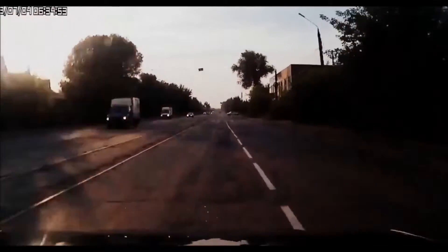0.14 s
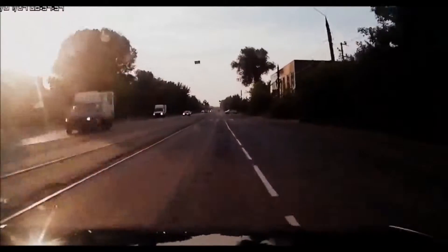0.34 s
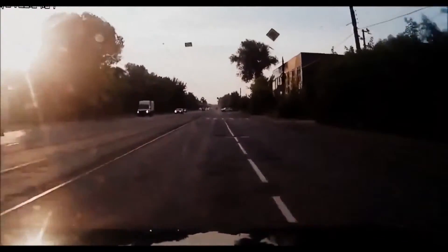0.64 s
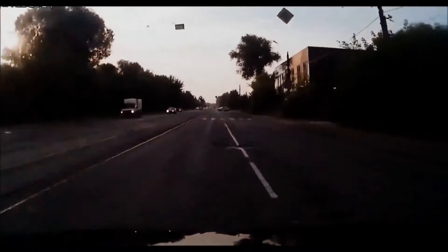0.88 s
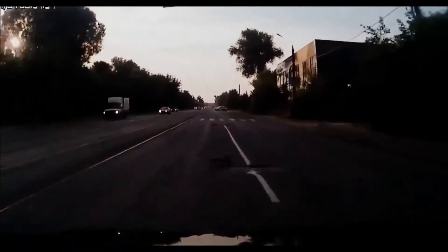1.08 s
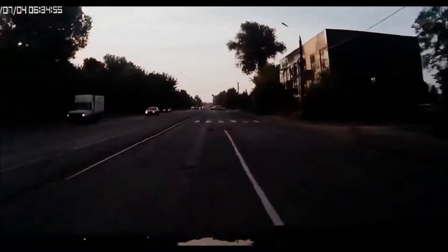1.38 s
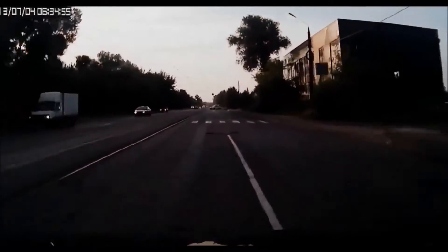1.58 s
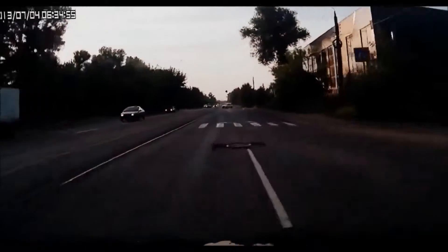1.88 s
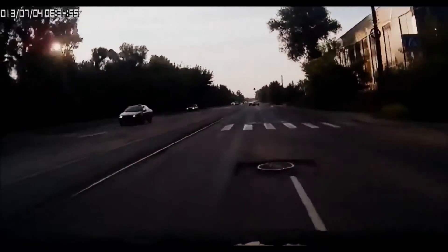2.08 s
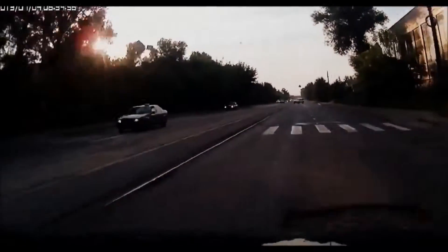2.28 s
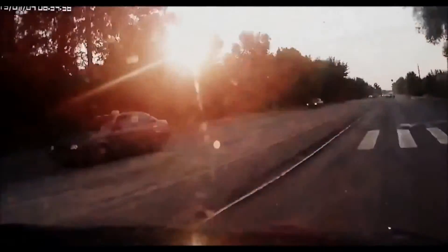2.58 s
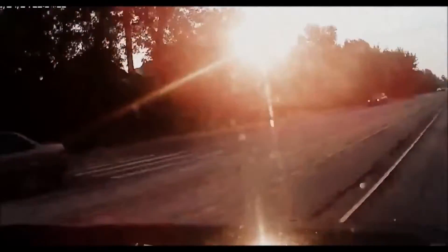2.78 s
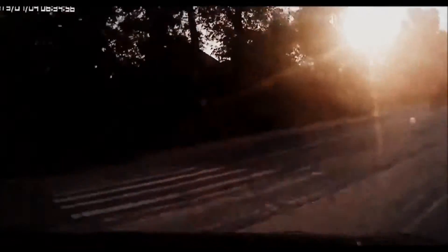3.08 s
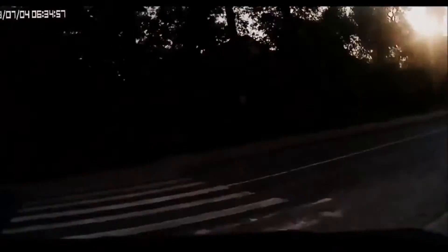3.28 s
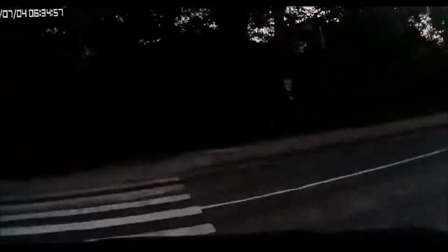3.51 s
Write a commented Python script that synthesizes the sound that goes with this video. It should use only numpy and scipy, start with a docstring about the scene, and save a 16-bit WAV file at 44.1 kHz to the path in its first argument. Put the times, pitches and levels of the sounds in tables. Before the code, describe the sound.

A car crash from the cabin, road noise with plastic ticks giving way to violent knocks and crunches.

```python
"""A steady road roar over a wavering engine hum, while a plastic windscreen mount ticks beside the microphone.
The car strikes a hole, slews and is hit again: crunching, low shudder, hard knocks and broken tyre chirps.
Roar and shudder are filtered noise, crunching is dense random impulses, ticks and knocks are enveloped or
decaying partials with noise, chirps are gliding tones and a faint whine is steady sines.
The sound cuts out to a thin hiss in short listed gaps; its peaks are clipped hard, almost flat, at the ceiling."""
import sys
import numpy as np
from scipy import signal
from scipy.fft import rfft, irfft, next_fast_len
from scipy.io import wavfile
from scipy.ndimage import map_coordinates

SR = 44100
rng = np.random.default_rng(int(sys.argv[2]) if len(sys.argv) > 2 else 0)


def voltage_ratio(decibels):
    """Convert decibels (scalar or array-like) to amplitude ratios, 20 dB per decade."""
    exponent = np.asarray(decibels, float) / 20
    return 10 ** exponent


def wav_out(sig):
    """Save sig, one row per channel (or a flat mono array), as 16-bit PCM at SR to the path in sys.argv[1]."""
    wavfile.write(sys.argv[1], SR, np.round(np.clip(np.atleast_2d(sig).T, -1, 1) * 32767).astype(np.int16))


N = 160965


def unit(x):
    """Normalisation: scales a signal to an rms of 1."""
    return x / np.sqrt(np.mean(x ** 2) + 1e-20)


def curves(rows):
    """Linear interpolation: one value per sample for each column after the time."""
    s, *cols = np.transpose(rows)
    return [np.interp(np.arange(N) / SR, s, c) for c in cols]


def wobble(rate):
    """Band-limited fluctuation: a spline through random knots, rate of them a second."""
    knots = rng.standard_normal(int(N * rate / SR) + 4)
    return map_coordinates(knots, [np.arange(N) * rate / SR])


def coloured(x, points):
    """Linear filtering: shapes the spectrum by (Hz, dB) points on a log-frequency axis, to rms 1."""
    m = next_fast_len(N + 8192)
    f, db = np.transpose(points)
    log_hz = np.log(np.fft.rfftfreq(m, 1 / SR) + 1)
    gain = voltage_ratio(np.interp(log_hz, np.log(f + 1), db))
    return unit(irfft(rfft(x, m) * gain, m)[:N])


def add(out, s, sound):
    """Superposition: mixes a sound in from time s, in seconds."""
    part = out[round(s * SR):][:len(sound)]
    part += sound[:len(part)]


def whine():
    """Steady pure tones from electronics, slightly modulated in amplitude."""
    # tones: f/Hz, relative level/dB (raised by 5 dB below)
    tones = [(7881, -69), (11989, -69)]
    t = np.arange(N) / SR
    return sum(voltage_ratio(db + 5 + 1.5 * wobble(25)) * np.sin(2 * np.pi * hz * t) for hz, db in tones)


def engine():
    """Phase modulation of a low sine by a slow random curve gives a wavering hum."""
    hum_hz, hum_db, stop_s, fade_s = 90.3, -36.5, 1.9, 0.085
    t = np.arange(N) / SR
    level = voltage_ratio(hum_db + wobble(6.9))
    tone = np.sin(2 * np.pi * hum_hz * t + 1.9 * wobble(9.5))
    return level * tone * np.clip((stop_s - t) / fade_s, 0, 1)


def road():
    """Broadband tyre and air turbulence: filtered noise whose level fluctuates gently."""
    # course of the roar: t/s, level/dB
    roar_course = [(0.0, -19), (0.31, -16.5), (0.86, -19), (1.27, -17), (1.74, -22), (2.26, -18.5),
                   (2.74, -28), (3.24, -20), (3.54, -20), (3.65, -29.5)]
    # spectrum of the roar: f/Hz, relative density/dB
    roar_colour = [(15, -51), (25, -19), (76, -6.5), (180, -9), (321, -1.5), (477, -1.5), (604, -1),
                   (689, -7.5), (807, -1.5), (1080, -5), (1400, -15.5), (2030, -12.5), (2570, -29.5),
                   (3260, -29.5), (4470, -48), (7370, -53), (8190, -58), (8860, -78), (11800, -51.5),
                   (13500, -41.5)]
    level_db, = curves(roar_course)
    unsteady_db = 0.63 * wobble(12) + 0.29 * wobble(45.2)
    return voltage_ratio(level_db + unsteady_db) * coloured(rng.standard_normal(N), roar_colour)


def mount():
    """Modal excitation: each tick briefly drives scattered plastic modes with a broadband snap."""
    # ticks: t/s, peak level/dB, level of snap over ring/dB
    tick_events = [(0.2666, -13, -10), (0.2926, -28, -9), (0.4038, -16.5, -24), (0.429, -23, -9),
                   (0.449, -21.5, -3), (0.5003, -14, -10), (0.5265, -14.5, -7), (0.618, -2.5, -8),
                   (0.7006, -16.5, -22), (0.8291, -11, -16), (1.2503, -14, -16), (1.303, -15, -20),
                   (1.3818, -9, -7), (1.5038, -15.5, -19), (1.6445, -18, -20), (1.8157, 1, -9.5),
                   (1.8826, -13, -7), (1.9219, 3.5, -5), (2.0873, -7, 11), (2.1096, -14, -10),
                   (2.1607, 3.5, 0), (2.2782, -5, 1), (2.3217, -23, 5), (2.386, 4.5, -1), (2.4026, -15, 2),
                   (2.437, -8.5, -14), (2.4888, -0.5, -5.5), (2.507, -17, -4), (2.551, -16.5, -4),
                   (2.582, -13.5, -10), (2.6697, -22, -6), (2.7697, -5, 2), (2.7971, 0, 15),
                   (3.0443, -10, -17), (3.235, -13, -10), (3.6085, -10.5, -9), (3.6195, -9.5, 3)]
    # modes of the plastic: f/Hz, relative level/dB
    plastic_modes = [(2200, 15.5), (2600, 4.5), (3700, -12), (4250, -1.5), (5300, -16), (5900, -9.5),
                     (7100, -18), (10200, -21), (12400, -11.5)]
    # spectrum of the snap: f/Hz, relative density/dB
    snap_colour = [(710, -40), (1200, 4), (2230, -6), (3440, -10), (5880, -6.5), (7210, -22), (9000, -35.5),
                   (12200, -22), (13500, -36)]
    tick_s, pitch_scatter, mode_scatter_db = 0.0028, 0.03, 2  # pitch scatter as a fraction
    out, t = np.zeros(N), np.arange(round(tick_s * SR)) / SR
    noise = coloured(rng.standard_normal(N), snap_colour)
    swell = (t / tick_s) ** 1.08 * (1 - t / tick_s) ** 1.43
    for s, db, snap_db in tick_events:
        ring = np.zeros(len(t))
        for hz, mode_db in plastic_modes:
            strength = voltage_ratio(mode_db + rng.normal(0, mode_scatter_db))
            ring += strength * np.sin(2 * np.pi * hz * rng.normal(1, pitch_scatter) * t)
        snap = voltage_ratio(snap_db) * noise[round(s * SR):][:len(t)]
        tick = (unit(ring) + snap) * swell
        add(out, s, voltage_ratio(db) * tick / np.abs(tick).max())
    return out


def chirps():
    """Broken squeal of sliding tyres: gliding tones, part pure and part narrow-band noise, swell and fade."""
    # chirps: centre t/s, length between 1/e points/s, f/Hz at the centre, glide/(Hz/s),
    # relative level/dB (raised by 3.5 dB below)
    squeals = [(2.334, 0.02, 1150, 0, -20), (2.431, 0.036, 1095, 999.5, -14.5), (2.53, 0.011, 3120, 0, -32),
               (2.538, 0.024, 1067, 2000.5, -24), (2.58, 0.022, 1135, 3000, -12.5),
               (2.579, 0.028, 1356, -3000, -14), (2.595, .032, 1500, -5000, -15),
               (2.591, 0.038, 2930, 4000, -28), (2.632, 0.03, 871, 1000.5, -16),
               (2.641, .012, 2010, -6000, -17), (2.649, 0.018, 1690, 4000.5, -17),
               (2.648, .016, 3130, -6000, -34), (2.666, 0.014, 1965, 1500.5, -14),
               (2.686, 0.019, 2010, 0.5, -24), (2.728, 0.018, 1980, 0.5, -20)]
    pure, noise_rate, wander = 0.58, 320, 0.015  # share of pure tone, knots a second, fraction of pitch
    out, t = np.zeros(N), np.arange(N) / SR
    for s, length, hz, glide, db in squeals:
        narrow_noise = wobble(noise_rate) + 1j * wobble(noise_rate)
        shake = pure + (1 - pure) * narrow_noise
        pitch = (hz + glide * (t - s)) * (1 + wander * wobble(60))
        tone = np.real(shake * np.exp(2j * np.pi * np.cumsum(pitch) / SR))
        out += voltage_ratio(db + 3.5) * np.exp(-(2 * (t - s) / length) ** 2) * tone
    return out


def grains():
    """Shot noise: dense random impulses of uneven size and either sign."""
    grains_per_s, spread_db = 9000, 2
    chance, size, sign = rng.random(N), rng.exponential(size=N), rng.standard_normal(N)
    return (chance < grains_per_s / SR) * voltage_ratio(spread_db * size) * sign


def wreck():
    """Crushing and scraping as clumped, filtered shot noise over a low noise shudder of the body."""
    # course of the wreck: t/s, crunch level/dB, bass level/dB, treble level/dB
    wreck_course = [(0, -60, -51, -55.5), (1.66, -31, -44.5, -51), (1.75, -19, -20, -38),
                    (1.8, -14.5, -29, -31), (1.83, -20, -31, -37), (1.9, -12.5, -24, -28.5),
                    (1.93, -32, -32, -40.5), (2.0, -22.5, -27, -44.5), (2.08, -13.5, -21, -28.5),
                    (2.15, -18, -34, -33), (2.2, -21, -39, -32.5), (2.28, -17.5, -35, -35.5),
                    (2.4, -19.5, -25, -37.5), (2.52, -19.5, -38, -38.5), (2.6, -23, -60, -45.5),
                    (2.7, -22, -40, -54), (2.76, -15, -16.5, -31.5), (2.86, -18, -25, -36.5),
                    (2.97, -14, -37, -33), (3.05, -15.5, -40, -32), (3.1, -27.5, -24, -41.5),
                    (3.28, -31.5, -29, -42), (3.36, -18, -53, -35), (3.43, -9.5, -24, -32.5),
                    (3.5, -17, -40, -30.5), (3.55, -24, -26, -37.5), (3.61, -16.5, -26.5, -32),
                    (3.65, -19, -24, -38)]
    # spectra of crunch, its treble and the bass shudder: f/Hz, relative density/dB
    crunch_colour = [(71, -35), (120, -5), (298, -2), (442, 0), (702, -3), (822, -0.5), (1450, -7.5),
                     (2070, -8), (2420, -16), (2800, -22), (3640, -28.5), (6160, -120)]
    treble_colour = [(1650, -44), (2800, -2), (5100, -10), (6170, -10), (7320, -22), (9040, -43),
                     (10700, -19), (12600, -18), (13500, -17)]
    bass_colour = [(15, -33), (25, -14), (91, 2), (172, -3.5), (220, 2.5), (290, -32.5), (480, -120)]
    crunch_db, bass_db, treble_db = curves(wreck_course)
    clumps = voltage_ratio(1.8 * wobble(70))
    crunch = coloured(grains() * clumps, crunch_colour)
    # the treble follows the clumps half as far in dB and has finer ones of its own
    treble_clumps = np.sqrt(clumps) * voltage_ratio(2 * wobble(120))
    treble = coloured(grains() * treble_clumps, treble_colour)
    shudder = coloured(rng.standard_normal(N), bass_colour) * voltage_ratio(0.69 * wobble(11))
    return voltage_ratio(crunch_db) * crunch + voltage_ratio(bass_db) * shudder + voltage_ratio(treble_db) * treble


def knocks():
    """Damped oscillation through the body: three decaying inharmonic partials with a noise crack."""
    # knocks: t/s, level/dB of the lowest partial before decay, its f/Hz, 60 dB decay time/s,
    # level of crack over thud/dB
    body_knocks = [(1.754, -15, 63, 0.28, -25), (1.796, -18, 110, .09, -20), (1.772, -12, 399, 0.073, -15),
                   (1.809, -2, 804, 0.021, -7), (1.884, -9.5, 550, 0.066, -17), (2.033, -12, 228, .07, -21),
                   (1.9851, -3.5, 256, 0.033, -28), (2.074, 0.5, 485, 0.032, -21),
                   (2.066, -17.5, 142, 0.16, -22), (2.061, -9, 620, 0.02, -12),
                   (2.120, -8.5, 594, 0.098, -7.5), (2.7549, -4.5, 397, 0.05, -15),
                   (2.8232, -10, 900, .02, -16), (2.835, 4, 460, 0.021, -2), (2.8405, 8, 1000, 0.0089, -10),
                   (2.8527, -1, 1190, 0.0054, 0), (2.8554, 6, 500, 0.01, -16),
                   (2.866, -2.5, 600, 0.021, -9), (2.870, 4.5, 510, 0.0057, 0),
                   (2.8765, -1, 350, .014, -24), (2.886, 4, 1180, 0.003, -17), (2.897, 2, 744, 0.014, -32),
                   (2.9211, 1, 400, 0.018, -27), (2.925, -12, 800, .008, -15),
                   (2.9315, -18, 700, .008, -10), (2.945, -8, 630, 0.023, -25),
                   (2.973, -10.5, 960, 0.038, -8), (2.99, -7, 680, 0.023, -24),
                   (3.034, -9, 900, 0.027, -15), (3.164, -3.5, 864, 0.027, -33),
                   (3.3765, 7, 673, 0.027, -18.5), (3.378, 7, 922, 0.023, -9.5),
                   (3.403, -2, 720, 0.023, -21), (3.415, -12, 406, 0.02, -22), (3.4212, 2, 790, 0.024, -14),
                   (3.4288, 0, 605, 0.013, -18), (3.4356, 2, 875, 0.013, -1.5),
                   (3.4385, -5, 600, .015, -16), (3.452, -6, 920, 0.0092, -14),
                   (3.4584, 1.5, 952, 0.032, -19), (3.474, -4.5, 490, 0.013, -20),
                   (3.483, -16, 600, .015, -8), (3.568, -16, 705, 0.0081, 3)]
    # spectrum of the crack: f/Hz, relative density/dB
    crack_colour = [(180, -36), (300, -4), (793, 4), (1360, -6.5), (5900, -16), (8780, -37), (11300, -25),
                    (12900, -18.5), (13500, -39)]
    roughness, rise_s = 0.45, 0.00053
    out, t = np.zeros(N), np.arange(8000) / SR
    noise = np.tile(coloured(rng.standard_normal(N), crack_colour), 2)
    for s, db, hz, t60, crack_db in body_knocks:
        # a random walk in phase roughens the pitch
        drift = np.cumsum(rng.standard_normal(len(t))) * roughness * np.sqrt(hz / SR)
        phase = 2 * np.pi * hz * t
        thud = np.sin(phase + drift)
        thud += 0.41 * np.sin(1.7 * phase + drift)
        thud += 0.2 * np.sin(2.6 * phase - drift)
        crack = voltage_ratio(crack_db) * noise[round(s * SR):][:len(t)]
        envelope = voltage_ratio(db - 60 * t / t60) * (1 - np.exp(-t / rise_s))
        add(out, s, envelope * (thud + crack))
    return out


def scene():
    """Linear superposition of all sources in one channel."""
    return (whine() + engine() + road() + mount() + chirps() + wreck() + knocks())[None]


def roll_off(x):
    """The treble ends steeply here."""
    return signal.sosfilt(signal.butter(12, 14030, fs=SR, output="sos"), x)


def record(dry):
    """Gating, low-pass filtering and limiting: gaps, a lost top and peaks clipped hard, almost flat."""
    # gaps: start t/s, length/s, gain in the gap/dB (besides the remaining hiss)
    mic_gaps = [(1.769, 0.0036, -14), (1.8336, 0.0028, -15), (1.839, 0.0047, -9), (1.8644, 0.0025, -21),
                (1.916, 0.0034, -15), (1.9883, 0.0058, -38), (2.004, 0.0044, -17), (2.092, 0.0019, -11),
                (2.0999, 0.006, -20), (2.114, 0.0048, -25), (2.3357, 0.0043, -22.5), (2.347, 0.0051, -16),
                (2.3888, 0.0068, -20), (2.755, .002, -22), (2.7686, 0.0015, -20), (2.8379, 0.0028, -20),
                (2.8425, 0.01036, -18), (2.857, 0.008, -15), (2.8776, 0.0082, -24), (2.8876, 0.0089, -21),
                (2.9, 0.022, -24.5), (2.9225, 0.0022, -24), (2.9275, 0.004, -38), (2.9332, 0.0072, -22),
                (2.952, 0.002, -28), (2.9624, 0.0088, -16.5), (2.983, 0.0062, -18), (3.002, 0.0036, -26),
                (3.0097, 0.008, -20), (3.032, 0.0033, -26), (3.3677, 0.0086, -23.5),
                (3.4073, 0.0083, -20.5), (3.431, 0.0051, -32), (3.446, 0.0074, -19), (3.4583, 0.0022, -26),
                (3.4664, 0.0065, -26), (3.48, 0.0019, -31), (3.4862, 0.0082, -15), (3.5144, 0.012, -15),
                (3.563, 0.0017, -20), (3.579, 0.0047, -27), (3.624, 0.0015, -32)]
    edge_s, hiss_db, hiss_hz = 0.00087, -15.5, 2460
    top_hz, ceiling, hardness = 13100, 1.0, 14
    t, gain_db = np.arange(N) / SR, np.zeros(N)
    for s, length, left_db in mic_gaps:
        inside = np.minimum(t - s, s + length - t)
        gain_db += left_db * np.clip(inside / edge_s + 0.5, 0, 1)
    # a thin hiss, made from the high-passed mix, remains in the gaps
    hiss = signal.lfilter(*signal.butter(2, hiss_hz, 'high', fs=SR), dry)
    x = dry * voltage_ratio(gain_db) + voltage_ratio(hiss_db) * (1 - voltage_ratio(gain_db)) * hiss
    x = irfft(rfft(x) / (1 + (np.fft.rfftfreq(N, 1 / SR) / top_hz) ** 120), N)
    x = x / (1 + np.abs(x / ceiling) ** hardness) ** (1 / hardness)
    return roll_off(x)


dry = scene()
out = record(dry)
wav_out(out)
```